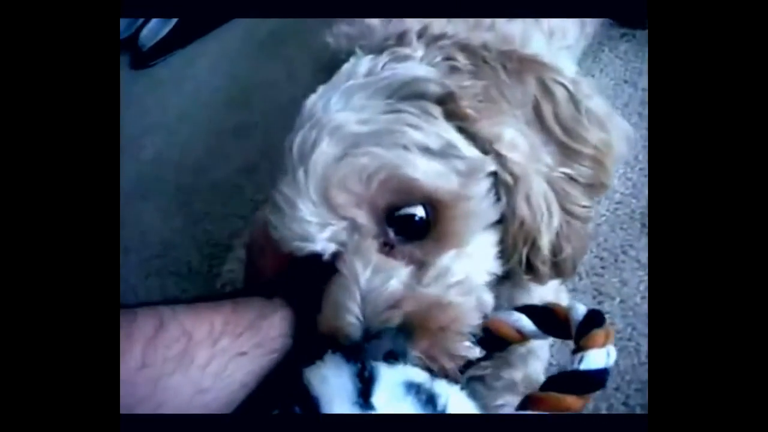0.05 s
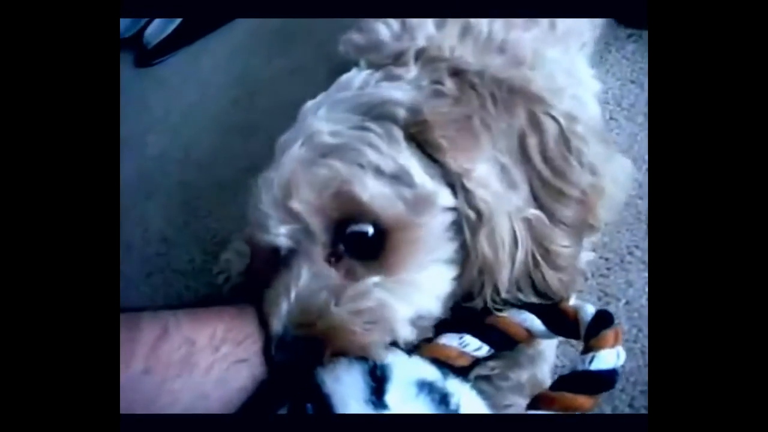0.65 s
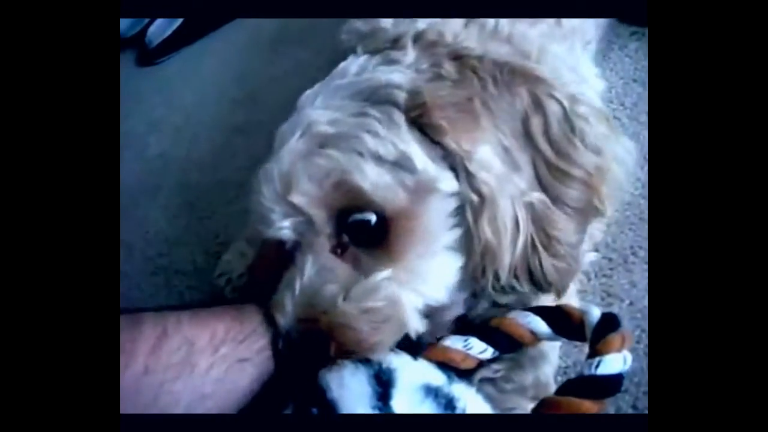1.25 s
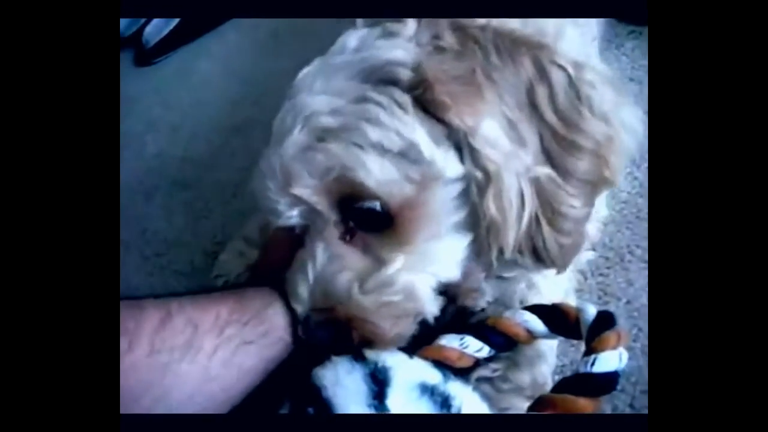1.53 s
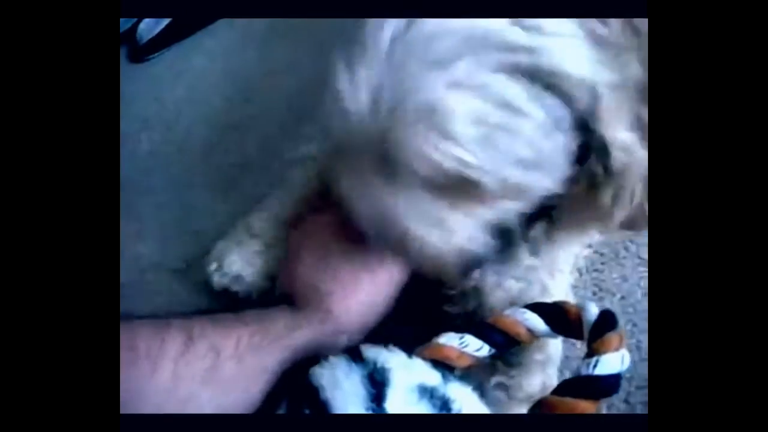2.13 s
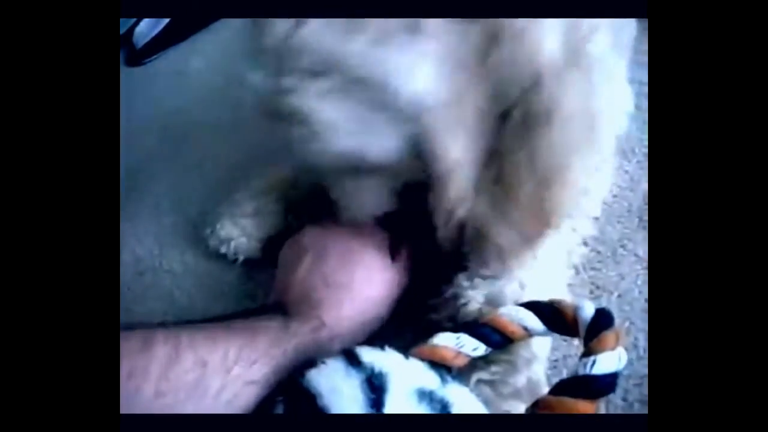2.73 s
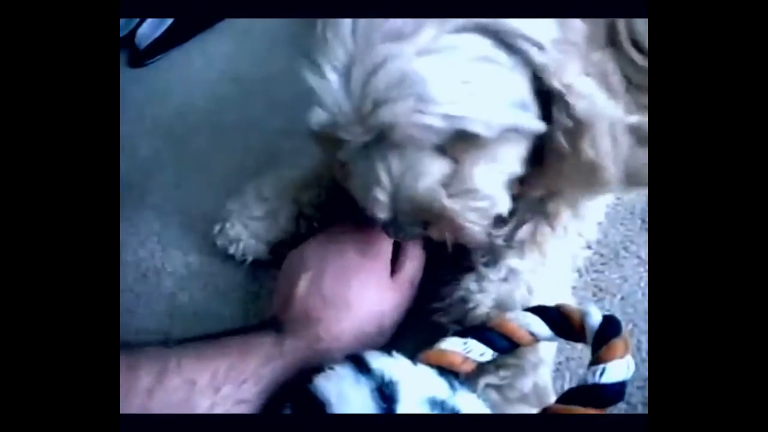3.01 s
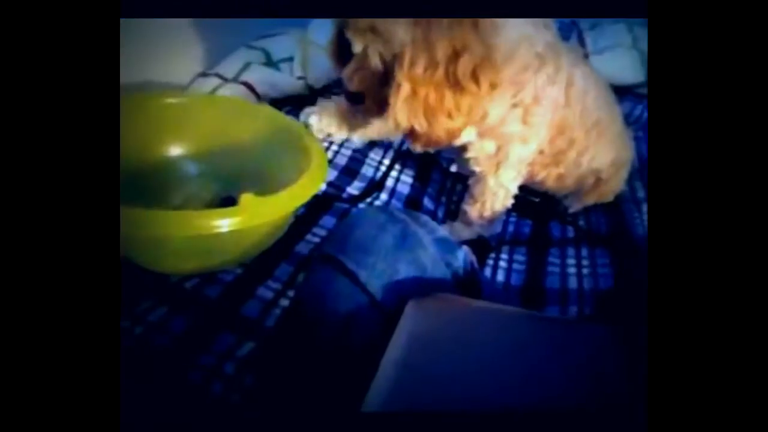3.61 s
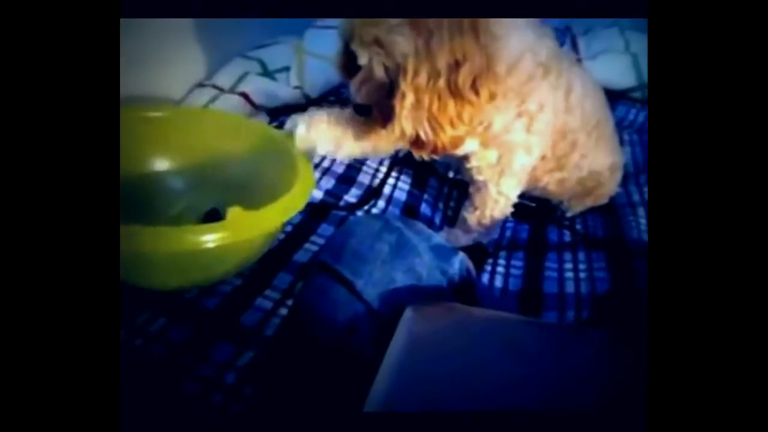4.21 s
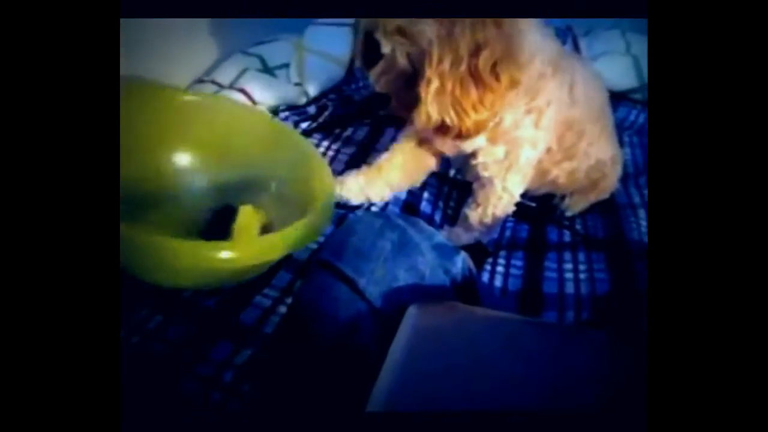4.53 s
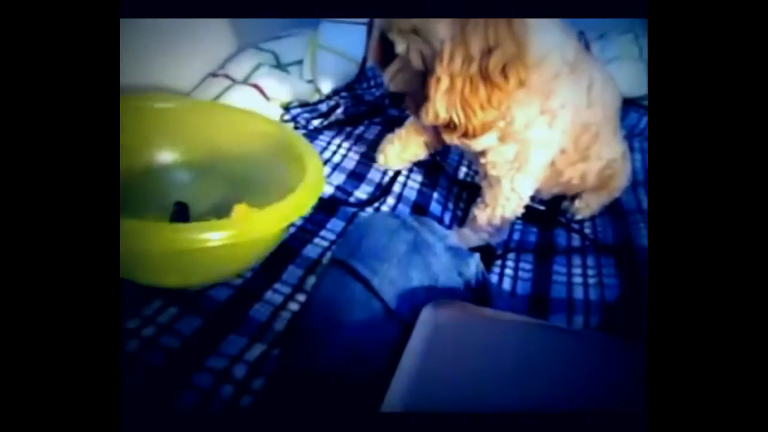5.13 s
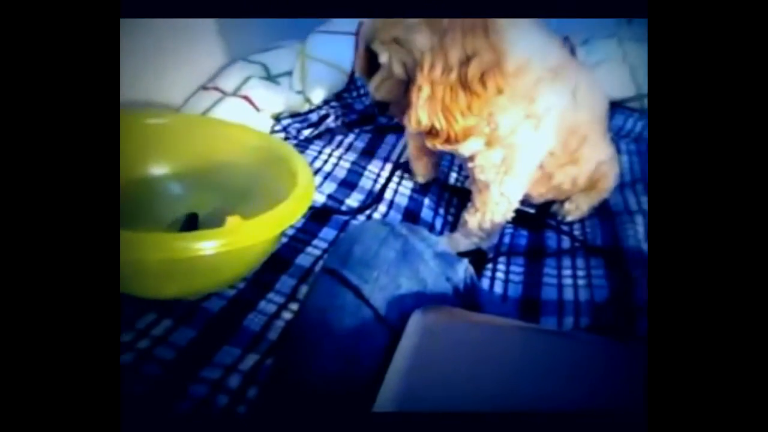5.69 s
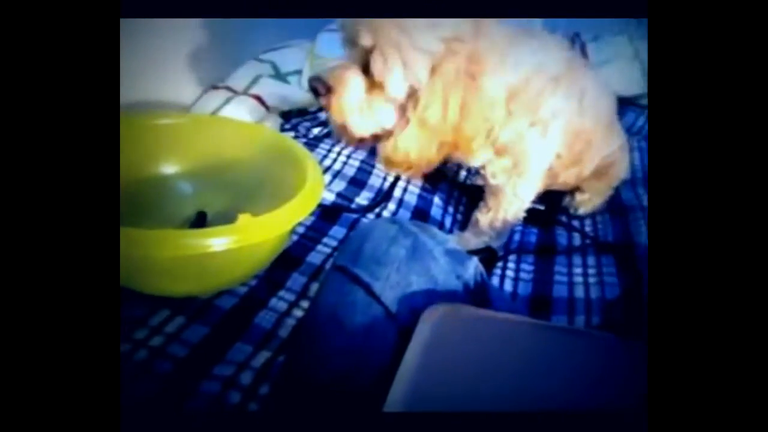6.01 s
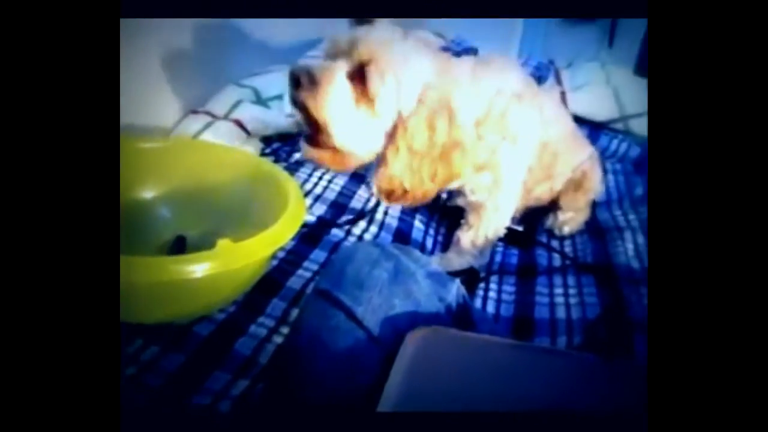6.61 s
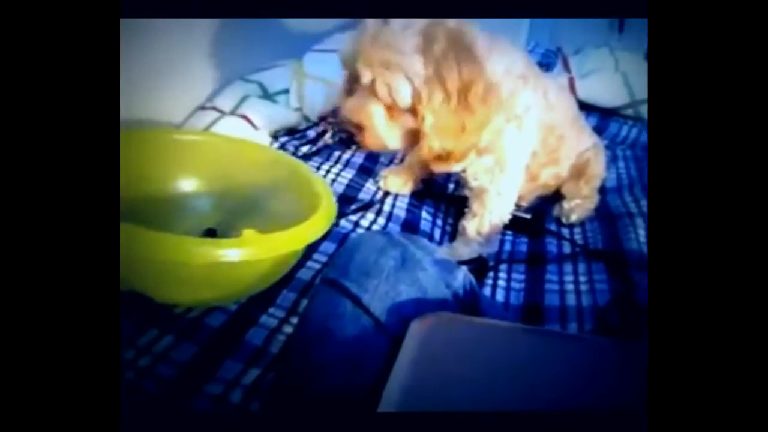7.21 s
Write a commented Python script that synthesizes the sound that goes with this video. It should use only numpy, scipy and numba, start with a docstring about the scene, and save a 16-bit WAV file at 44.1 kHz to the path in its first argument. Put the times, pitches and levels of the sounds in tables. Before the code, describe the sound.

Close to a hissy microphone indoors, a small dog gives four raspy, playful growls, its teeth clicking as it lets go of a toy. Then, on a bed, its paw knocks and scrapes irregularly on a plastic bowl holding a bit of food, among soft thuds. The dog whines thinly for a moment and barks three times, high and sharp, much louder than the growls and ringing briefly in the small room.

```python
"""A small dog growls four times over a rope toy, close to a cheap microphone on a carpet.
Slow, uneven slaps of its vocal folds excite the resonances of chest, mouth and snout.
Then, on a bed, it paws at a plastic bowl with a bit of food in it, which rings under impact and
friction, among soft, low thuds. The dog whines and gives three sharp barks, harmonic series shaped
by the open mouth, that reverberate in the room. Microphone hiss lies under both scenes."""
import sys
import numpy as np
from scipy import signal
from scipy.fft import rfft, irfft
from scipy.io import wavfile
from scipy.ndimage import uniform_filter1d
from numba import njit

SR = 44100
rng = np.random.default_rng(int(sys.argv[2]) if len(sys.argv) > 2 else 0)


def master(y):
    """Save y as 16-bit WAV."""
    cut = np.clip(np.atleast_2d(y).T, -1, 1)
    pcm = np.round(cut * 32767)  # scale
    wavfile.write(sys.argv[1], SR, pcm.astype(np.int16))


N = 324135
TIME = np.arange(N) / SR
BEDROOM_START_S, END_S, BAND_HZ = 3.378, 7.17, 10400
BARK_ATTACK_S = 0.0059

# Growls: start_s, length_s, start_slaps_per_s, end_slaps_per_s, start_roughness, end_roughness,
# start_throb_db, end_throb_db, teeth_hiss_db
GROWLS = [(0.125, 0.55, 108, 116, 0.3, 0.32, 9.5, 1.6, -17.5),
          (0.933, 0.74, 100, 113, 0.31, 0.31, 5.5, 7.43, -12),
          (1.875, .54, 116, 140, .24, .65, 6.5, 0.97, -19.5),
          (2.62, 0.2, 116, 130, .3, 0.3065, 11.5, 1, -15)]
# Vocal effort, one curve a growl: time_s, level_db, mouth_gain_db, rasp_gain_db
GROWL_EFFORT = [
    [(0.125, -37.5, -0.5, -11), (0.157, -33, 3, -4.5), (0.457, -39, 2.5, -2.5), (0.583, -31.5, 0.5, -4.5),
     (0.69, -37.5, -2, -4.5)],
    [(0.96, -40.5, -1.5, -8), (0.972, -33.5, -2, -10.5), (1.094, -38, -2.5, -7), (1.578, -33, 1, -5),
     (1.68, -34, -2.5, -10)],
    [(1.88, -33.5, -1.5, -4), (1.916, -30, -1, -5), (2.09, -26, -4, -7), (2.252, -33.5, 3.5, -4.5),
     (2.41, -31, 0, -5)],
    [(2.63, -33, -4, -11.5), (2.684, -26, -9.5, -25), (2.708, -30.5, -5.5, -12.5), (2.792, -32, -8, -28),
     (2.83, -41, -8, -18)],
]
# Chest resonances: centre_hz, width_hz, gain_db
CHEST_MODES = [(157, 25, -6), (246, 150, -4), (349, 176, -6)]
# Snout resonances with the lips at rest: centre_hz, width_hz, gain_db
SNOUT_MODES = [(7860, 1250, -7.5), (9890, 2900, -9.5)]
# Two lowest formants, set by the jaw: time_s, first_hz, second_hz, second_gain_db
JAW_FORMANTS = [(1.69, 822, 1162, 0), (2.12, 752, 1160, -1), (2.27, 748.5, 1722, 4),
                (2.42, 750, 1600, -3.5), (2.62, 760, 1000, -39), (2.84, 574, 900, -35)]
# Middle formant that comes through as the mouth opens: time_s, gain_db
GAPE_GAIN = [(0.2, -10.5), (0.55, -7), (1.05, -14), (1.3, 0.5), (1.5, -9.5), (2.1, -11.5), (2.25, -29),
             (2.42, -26), (2.62, -35)]
# Third formant, highest with the lips drawn back: time_s, centre_hz
LIP_FORMANT = [(0.2, 2590), (0.58, 2850), (1.0, 2740), (1.55, 2850), (1.7, 2650), (1.875, 4750),
               (1.98, 3560), (2.27, 2740), (2.62, 3286)]
# Barks: start_s, hold_s, opening_hz, held_hz, opening_db, held_db, brightness_db, puff_db
BARKS = [(5.953, .098, 248, 737.4, -11, -10.5, -3, -20), (6.291, .064, 635, 734.4, -9.5, -5, -8, -37),
         (6.688, .1, 265.8, 745, -13.5, -6.5, -0.5, -37)]
# Mouth formants of the barks, with the recorder's bright fizz above 6 kHz: frequency_hz, gain_db
BARK_SPECTRUM = [(150, -19.5), (300, -7), (500, -16.5), (730, -5), (950, 5), (1150, -0.5), (1450, -1.5),
                 (1850, -3.5), (2200, -13), (2700, -9), (3300, -24), (4600, -25), (7600, -21.5),
                 (9700, -15.5)]
# Brief squeaks where the voice cracks: centre_s, half_length_s, jump_hz, brightness_db, gain_db
VOICE_CRACKS = [(6.045, .006, 21.5, 9.5, -8), (6.06, .007, 0, 24.5, 3), (6.306, .009, 189.5, 21.5, -1.5)]
# Course of the whine: time_s, pitch_hz, level_db
WHINE_CURVE = [(5.73, 952, -47), (5.78, 992, -43), (5.86, 1008, -41), (5.955, 982, -41.5)]
# Three harmonics of the whine, plus two faint high tones from the recorder: pitch_multiple, gain_db
WHINE_PARTIALS = [(1, -14.5), (2, -4.5), (3, -14.5), (8, -31.5), (10, -17)]
# Impacts of paw and food on the bowl: start_s, relative_level_db, centre_hz
KNOCKS = [(3.378, -14.5, 567), (3.742, -12, 3080), (3.854, -17.5, 2730), (3.862, -13, 1720),
          (3.985, -8.5, 620), (4.35, -15, 1570), (4.503, -27, 1510), (4.517, -12, 585), (4.541, -9.5, 824),
          (4.57, -5.5, 2400), (4.885, -3, 766), (4.913, -9.5, 430), (5.04, -9.5, 540), (5.37, -13, 460),
          (5.435, -13, 260), (5.614, -18, 528), (5.715, -17, 840)]
# Claw strokes over plastic and cloth: centre_s, length_s, level_db, centre_hz
SCRAPES = [(3.891, 0.2, -38, 2300), (3.989, 0.056, -27, 2520), (4.517, 0.049, -23, 2620),
           (4.559, 0.082, -28.5, 2520), (5.495, .14, -29.5, 2110), (5.627, 0.1, -34.5, 1100)]
# Knocks and scrapes: the bowl's ring, with recorder fizz above 6 kHz: frequency_hz, gain_db
CONTACT_SPECTRUM = [(71, -14), (120, -10), (330, -0.5), (710, 0.5), (1070, -4.5), (1270, -6.5), (2220, -5),
                    (2890, -9.5), (3170, -11), (5250, -15), (5660, -12.5), (6960, -15), (9930, -10),
                    (10500, -27.5), (13600, -60.5), (22000, -120)]
# Short, soft, low hums and thuds: centre_s, length_s, start_hz, end_hz, level_db
THUDS = [(4.222, 0.025, 307, 257, -37.5), (4.844, 0.058, 258, 234, -31), (5.035, 0.036, 474, 417, -28),
         (5.095, 0.038, 239, 246, -39), (5.328, 0.058, 263, 223, -37.5), (5.376, 0.064, 389, 471, -34.5),
         (5.504, .04, 348, 330, -30), (6.202, 0.036, 392, 328, -30), (6.551, .07, 631, 462, -45)]
# Teeth meeting as the toy is let go: time_s, impulse_db
TOOTH_CLICKS = [(2.369, -3), (2.867, -20)]
# Noise spectrum on the carpet: frequency_hz, gain_db
CARPET_HISS = [(15, 25.5), (25, -13.5), (123, -5), (346, -14), (457, -14), (2970, -18.5), (10500, -27.5),
               (13600, -91), (22000, -120)]
# Noise spectrum in the bedroom: frequency_hz, gain_db
BEDROOM_HISS = [(15, -28.5), (25, -4), (298, -6.5), (777, -9.5), (2550, -14), (4230, -14), (10500, -22.5),
                (13600, -66.5), (22000, -120)]
# Course of the bedroom hiss: time_s, level_db
BEDROOM_HISS_LEVEL = [(5.3, -45), (5.7, -42), (6.1, -43), (6.5, -46.5), (6.64, -53.5), (6.9, -45.5),
                      (7.15, -54)]
# Thin tones in the bedroom hiss: pitch_hz, initial_level_db
HISS_TONES = [(4135, -59.5), (5706, -62), (7870, -63.5)]


def growls(throb_hz=23.45, slowing_hz_per_s=8.4):
    """Source and filter: fold slaps, flapping tissue and breath drive chest, mouth and snout."""
    age, length, *ends, teeth_hiss_db = latest(GROWLS)
    progress = np.clip(age / length, 0, 1)
    slaps_per_s, rough, throb_db = (a + (b - a) * progress for a, b in zip(ends[::2], ends[1::2]))
    level_db, mouth_db, rasp_db = in_time([row for curve in GROWL_EFFORT for row in curve])
    slaps, cycle = fold_slaps(slaps_per_s, rough)
    flaps, _ = fold_slaps(slaps_per_s * 1.7, rough, jitter=.7, spread_db=8)
    air = rms_one(rng.standard_normal(N) * np.exp(-cycle))
    # a few strong slaps alternate with a few weak ones, ever more slowly
    turns = age * (throb_hz - .5 * slowing_hz_per_s * age)
    throb = from_db(throb_db * (1 + 0.14 * wander(25.87)) * np.tanh(2 * np.cos(2 * np.pi * turns)))
    flutter = rough * (3.3 * flaps + air)
    source = flutter - slaps * throb
    voice = evened(chest(flutter - slaps * np.sqrt(throb), slaps_per_s), 0.043)
    voice += from_db(mouth_db + 1.5) * evened(mouth(source, rough), 0.072)
    voice += from_db(rasp_db + 1) * evened(snout_rasp(source + 0.59 * air, rough, teeth_hiss_db), 0.0636)
    return from_db(level_db) * voice * lasting(age, length, edge_s=0.0053)


def fold_slaps(per_s, rough, jitter=.2, spread_db=5):
    """Each closure of the folds is an impulse, uneven in time and strength; also gives cycle position."""
    cycles = np.cumsum(per_s * (1 + jitter * rough * wander(110))) / SR
    clicks = np.diff(np.floor(cycles), prepend=0) * from_db(spread_db * rough * wander(300))
    return rms_one(clicks), cycles % 1


def chest(source, slaps_per_s):
    """Forced resonance of the chest reinforces the lowest harmonics."""
    fundamental = from_db(-3) * resonance(source, 1.23 * slaps_per_s, 24)
    modes = sum(from_db(db) * resonance(source, hz, width) for hz, width, db in CHEST_MODES)
    return cut(cut(fundamental + modes, 109.6, "high", order=6), 351, "low", order=6)


def mouth(source, rough):
    """Cavity resonance: the air in the mouth has formants that move with the jaw."""
    first_hz, second_hz, second_db = in_time(JAW_FORMANTS)
    gape_db, = in_time(GAPE_GAIN)
    first = formant(source, first_hz, first_hz * 0.64)
    second = from_db(second_db) * formant(source, second_hz, second_hz * (0.11 + .5 * rough))
    gape = from_db(gape_db) * formant(source, hz=1950, width_hz=580)
    return cut(first + second + gape, 1940, "low", order=3)


def snout_rasp(source, rough, teeth_hiss_db, lips_rest_hz=2870):
    """Upper formants: drawing back the lips raises one pair and lowers those of the snout."""
    third_hz, = in_time(LIP_FORMANT)
    third = resonance(source, third_hz, third_hz * 0.44, order=4)
    fourth = (0.51 + 0.16 * rough) * resonance(source, 1.227 * third_hz, 910, order=4)
    sag_hz = np.maximum(third_hz - lips_rest_hz, 0)
    snout = sum(from_db(db) * resonance(source, hz - sag_hz, width, order=4)
                for hz, width, db in SNOUT_MODES)
    return third + fourth + snout + from_db(teeth_hiss_db) * formant(source, hz=5200, width_hz=3600)


def barks(yelp_width_octaves=0.24):
    """A harmonic series sweeps through the formants of the open mouth, mixed with turbulent breath."""
    hz, level_db, rough, bright_db, yelp_hz, gate = bark_gesture()
    phase = phase_of(hz * (1 + .012 * wander(450) + 0.053 * rough * wander(900)))
    on, voice = gate > 0, np.zeros(N)
    for k in range(1, 31):
        line_hz = k * hz[on]
        yelp_db = bright_db[on] * np.exp(-.5 * (np.log2(line_hz / yelp_hz[on]) / yelp_width_octaves) ** 2)
        rolloff_db = -5.5 * np.log2(np.maximum(line_hz / 2400, 1))
        gain = from_db(at_hz(BARK_SPECTRUM, line_hz) + yelp_db + rolloff_db) * (line_hz < BAND_HZ)
        # the throat delays each harmonic differently, which blunts the pulses
        voice[on] += gain * np.cos(k * phase[on] - np.pi * np.log2(line_hz))
    air = coloured(rng.standard_normal(N) * (1 + np.cos(phase)), BARK_SPECTRUM, tilt_db=3.0)
    voice = evened(voice, 0.0058) * (1 + 0.94 * rough * wander(500))
    voice += (0.3 + .55 * rough) * rms_one(air)
    # soft limiting keeps the bark dense and even
    return from_db(level_db) * gate * evened(np.tanh(.5 * voice), 0.004)


def bark_gesture(rise_s=.056, swell_s=0.067, release_s=.032,
                 creep_hz_per_s=800, drop_hz_per_s=10000, fade_db_per_s=475.5):
    """Fold tension sets the pitch, which leaps, creeps up and drops; slack folds are hoarse and bright."""
    age, hold_s, open_hz, held_hz, open_db, held_db, bright_db, _ = latest(BARKS)
    gate = lasting(age, hold_s + release_s, edge_s=0.0029)
    age = np.clip(age, 0, hold_s + release_s)
    released_s = np.maximum(age - hold_s, 0)
    note_hz = held_hz - creep_hz_per_s * np.maximum(hold_s - age, 0)
    hz = np.maximum(open_hz + (note_hz - open_hz) * ease(age / rise_s) - drop_hz_per_s * released_s, 100)
    level_db = open_db + (held_db - open_db) * ease(age / swell_s)
    level_db -= 25.5 * (1 - ease(age / BARK_ATTACK_S)) + fade_db_per_s * released_s
    slack = np.clip(1 - hz / note_hz, 0, 1)
    rough = 0.03 + .8 * slack
    bright_db = bright_db + 15 * np.sqrt(slack)
    for s, half_s, jump_hz, squeak_db, db in VOICE_CRACKS:
        crack = ease(2 - np.abs(TIME - s) * np.sqrt(2) / half_s)
        hz += jump_hz * crack
        bright_db += squeak_db * crack
        level_db += db * crack
    yelp_hz = 2030 + 1070 * np.exp(-age / 0.047)   # this resonance slides down as the jaw opens
    return hz, level_db, rough, bright_db, yelp_hz, gate


def puffs(cutoff_hz=330, t60_s=0.086):
    """Turbulence: a dull gust leaves the mouth as each bark opens."""
    age, *_, db = latest(BARKS)
    gust = rms_one(cut(rng.standard_normal(N), cutoff_hz, "low"))
    return from_db(db - 60 * np.maximum(age, 0) / t60_s) * ease(age / BARK_ATTACK_S) * gust


def whine():
    """Nearly periodic vibration, radiated through the nose, gives a thin, clean tone."""
    hz, level_db = in_time(WHINE_CURVE)
    start_s, end_s = WHINE_CURVE[0][0], WHINE_CURVE[-1][0]
    phase = phase_of(hz * (1 + 0.0016 * wander(99)))
    tone = rms_one(sum(from_db(db) * np.sin(k * phase) for k, db in WHINE_PARTIALS))
    return from_db(level_db) * lasting(TIME - start_s, end_s - start_s, edge_s=0.0059) * tone


def knocks(chatter_t60_s=0.03):
    """Impact excitation: a click and a brief chatter set the bowl ringing."""
    out, t = np.zeros(N), TIME[:SR // 10]
    for s, db, centre_hz in KNOCKS:
        contact = rng.standard_normal(len(t)) * from_db(-60 * t / chatter_t60_s) + 4 * (t == 0)
        hit = bowl_ring(contact, centre_hz)
        onset_rms = np.sqrt(np.mean(hit[:SR // 200] ** 2))
        at = int((s + .0035) * SR)
        out[at:at + len(t)] += from_db(db - 10) * hit / onset_rms
    return out


def scrapes(ticks_per_s=1500):
    """Stick-slip friction: claws catch and slip in dense ticks under a swelling stroke."""
    out = np.zeros(N)
    for s, length, db, centre_hz in SCRAPES:
        n, at = int(length * SR), int((s - length / 2) * SR)
        ticks = rng.standard_normal(n) * (0.028 + (rng.random(n) < ticks_per_s / SR))
        out[at:at + n] += from_db(db) * np.hanning(n) * rms_one(bowl_ring(ticks, centre_hz))
    return out


def bowl_ring(contact, centre_hz, body_db=8):
    """Contact hardness tilts the spectrum: claws and food sound bright, the soft pad hollow."""
    ring = coloured(contact, CONTACT_SPECTRUM, tilt_db=1.5 * np.log2(centre_hz / 1500))
    return ring + from_db(body_db) * resonance(ring, centre_hz, width_hz=centre_hz)


def thuds(octave_db=-14):
    """Tone bursts: a gliding fundamental and a weak octave are heard as soft, low hums and thuds."""
    out = np.zeros(N)
    for s, length, start_hz, end_hz, db in THUDS:
        n, at = int(length * SR), int((s - length / 2) * SR)
        phase = phase_of(np.linspace(start_hz, end_hz, n))
        hum = np.sin(phase) + from_db(octave_db) * np.sin(2 * phase)
        out[at:at + n] += from_db(db) * np.sqrt(2) * np.hanning(n) * hum
    return out


def teeth(hz=1700, width_hz=1400):
    """The impulse response of the heavily damped mouth is a hard tick."""
    clicks = np.zeros(N)
    for s, db in TOOTH_CLICKS:
        clicks[int(s * SR)] = from_db(db)
    return formant(clicks, hz, width_hz) * SR / (2 * np.pi * width_hz)


def fur_rustle(start_s=2.855, fade_s=0.12, level_db=-42.5):
    """Friction noise: fur brushes the hand unevenly after the last growl."""
    age = np.maximum(TIME - start_s, 0)
    friction = rng.standard_normal(N) * from_db(3 * wander(150))
    hairs = rms_one(formant(friction, hz=3500, width_hz=3500))
    return from_db(level_db) * ease(age / 0.0077) * np.exp(-age / fade_s) * hairs


def room(x, t60_s, wet_db):
    """Reverberation: dense, dulled reflections arrive after 4 ms and decay exponentially."""
    t = TIME[:SR]
    tail = cut(rng.standard_normal(SR), 4900, "low", order=1) * from_db(-60 * t / t60_s) * (t > .004)
    return from_db(wet_db) * signal.fftconvolve(x, tail / np.sqrt(np.sum(tail ** 2)))[:N]


def hiss(spectrum):
    """Stationary, band-limited microphone noise of rms 1."""
    return rms_one(cut(coloured(rng.standard_normal(N), spectrum), BAND_HZ, "low", order=8))


def bedroom_hiss():
    """Amplitude modulation: hiss and three thin tones swell and dip together."""
    tones = sum(from_db(db) * np.sqrt(2) * np.sin(phase_of(hz + 10 * wander(36))) for hz, db in HISS_TONES)
    gain = from_db(in_time(BEDROOM_HISS_LEVEL)[0])
    return gain * (hiss(BEDROOM_HISS) + tones / gain[0])


def from_db(db):
    """Amplitude ratio of a level."""
    return 10 ** (np.asarray(db) / 20)


def phase_of(hz):
    """Phase is the time integral of frequency."""
    return 2 * np.pi * np.cumsum(hz) / SR


def rms_one(x):
    """Normalises the overall rms to 1."""
    return x / np.sqrt(np.mean(x ** 2) + 1e-20)


def evened(x, window_s):
    """Holds the running rms at 1."""
    return x / np.sqrt(np.abs(uniform_filter1d(x * x, int(window_s * SR))) + 1e-12)


def in_time(rows):
    """Linear interpolation of each column over time."""
    s, *columns = np.transpose(sorted(rows))
    return [np.interp(TIME, s, c) for c in columns]


def at_hz(spectrum, hz):
    """Reads a spectrum on a log-frequency axis."""
    points_hz, db = np.transpose(spectrum)
    return np.interp(np.log(np.maximum(hz, 1)), np.log(points_hz), db)


def latest(events):
    """At every moment: the age of the latest event in s, then its other columns."""
    rows = np.array(events)
    start, *columns = rows.T[:, np.maximum(np.searchsorted(rows[:, 0], TIME) - 1, 0)]
    return [TIME - start, *columns]


def lasting(age, length, edge_s):
    """1 while a call lasts, with short ramps outside it."""
    return np.clip(1 + np.minimum(age, length - age) / edge_s, 0, 1)


def ease(share):
    """Smooth step from 0 to 1."""
    return .5 - .5 * np.cos(np.pi * np.clip(share, 0, 1))


def wander(per_s):
    """Random modulation: Gaussian values joined by straight lines."""
    return np.interp(TIME * per_s, np.arange(N // 16), rng.standard_normal(N // 16))


def coloured(x, spectrum, tilt_db=0, size=2048):
    """Minimum-phase filter with this spectrum, tilted in dB an octave."""
    hz = np.maximum(np.fft.rfftfreq(size, 1 / SR), 20)
    octaves = np.log2(np.maximum(hz, spectrum[0][0]) / np.mean(hz))
    cepstrum = irfft(np.log(from_db(at_hz(spectrum, hz) + tilt_db * octaves)))
    cepstrum[1:size // 2] *= 2
    cepstrum[size // 2 + 1:] = 0
    return signal.fftconvolve(x, irfft(np.exp(rfft(cepstrum))))[:len(x)]


@njit
def two_pole(x, cosine, radius):
    """Damped resonator whose centre and width may move."""
    y = np.zeros(len(x))
    for i in range(2, len(x)):
        r = radius[i]
        drive = (1 - r * r) / 2 * (x[i] - x[i - 2])
        y[i] = drive + 2 * r * cosine[i] * y[i - 1] - r * r * y[i - 2] + 1e-18
    return y


def resonance(x, hz, width_hz, order=1):
    """Resonators in cascade: a band-pass of peak gain 1, steeper with each order."""
    cosine = np.cos(2 * np.pi * hz / SR) * np.ones(len(x))
    radius = np.exp(-np.pi * width_hz / SR) * np.ones(len(x))
    for _ in range(order):
        x = two_pole(x, cosine, radius)
    return x


def formant(x, hz, width_hz):
    """Two resonators in cascade: a hump with deep valleys beside it."""
    return resonance(x, hz, width_hz, order=2)


def cut(x, hz, kind, order=2):
    """Maximally flat low-pass or high-pass filter."""
    return signal.sosfilt(signal.butter(order, hz, kind, fs=SR, output="sos"), x)


def scene():
    """Direct sound, reflections and noise superpose, first on the carpet, then in the bedroom."""
    growling = growls() + teeth() + fur_rustle()
    carpet = growling + room(growling, t60_s=0.42, wet_db=-18.5) + from_db(-43) * hiss(CARPET_HISS)
    calls_and_thuds = barks() + puffs() + whine() + thuds()
    bowl = knocks() + scrapes()
    direct = calls_and_thuds + bowl
    reflections = room(calls_and_thuds, t60_s=0.18, wet_db=-9.5) + room(bowl, t60_s=0.28, wet_db=-11.5)
    reflections += room(direct, t60_s=0.55, wet_db=-19.5)
    bedroom = (direct + reflections + bedroom_hiss()) * np.clip((END_S - TIME) / 0.013, 0, 1)
    return np.where(TIME < BEDROOM_START_S, carpet, bedroom)[None]


def record(dry, ceiling=.9, cutoff_hz=15800):
    """Saturation rounds the peaks, and low-pass filters narrow the band."""
    rounded = ceiling * np.tanh(dry / ceiling)
    narrow = signal.sosfilt(signal.ellip(10, .2, 80, BAND_HZ, fs=SR, output="sos"), rounded)
    # on the carpet, samples held at half rate mirror the treble upwards
    held = np.repeat(narrow[:, ::2], 2, axis=1)[:, :N]
    joined = np.where(TIME < BEDROOM_START_S, held, narrow)
    return signal.sosfilt(signal.ellip(10, .2, 80, cutoff_hz, fs=SR, output="sos"), joined)


dry = scene()
out = record(dry)
master(out)
```